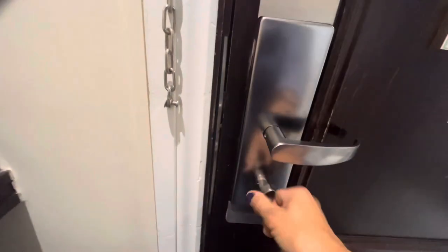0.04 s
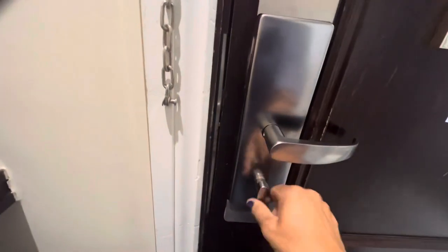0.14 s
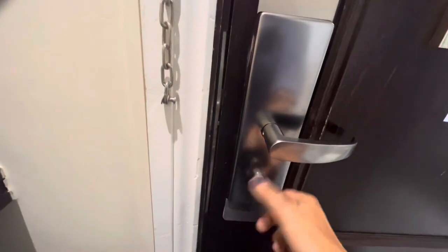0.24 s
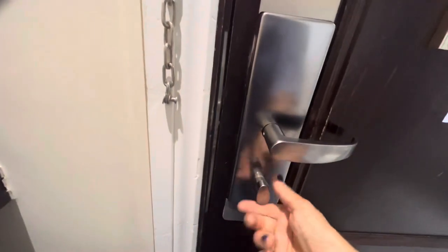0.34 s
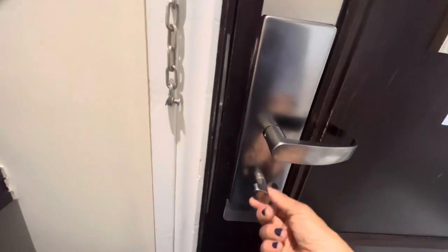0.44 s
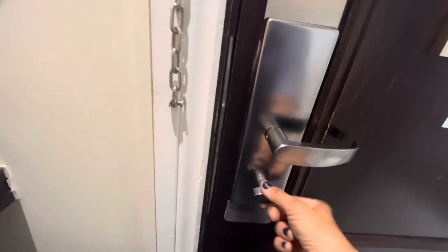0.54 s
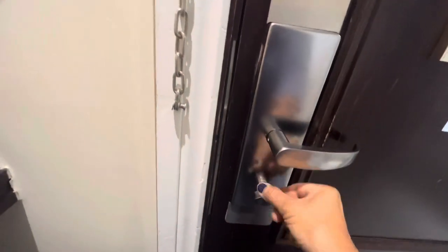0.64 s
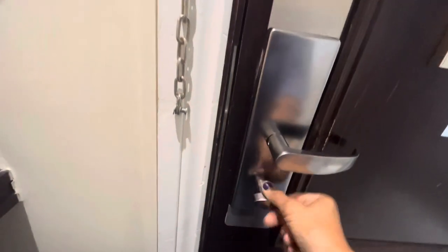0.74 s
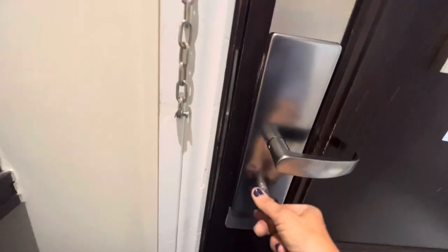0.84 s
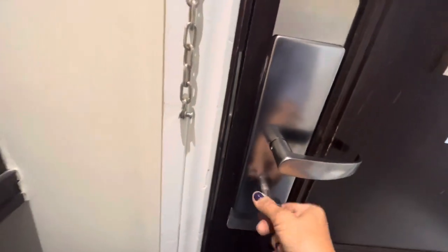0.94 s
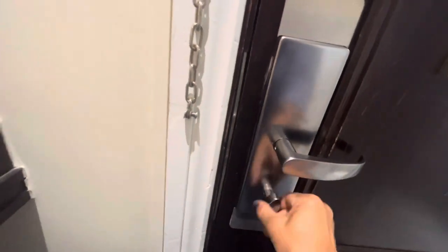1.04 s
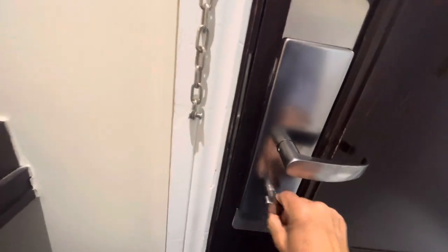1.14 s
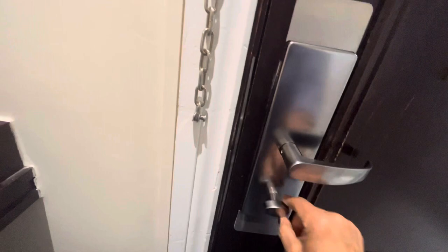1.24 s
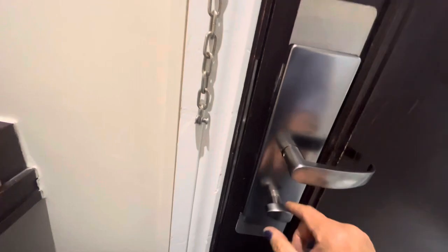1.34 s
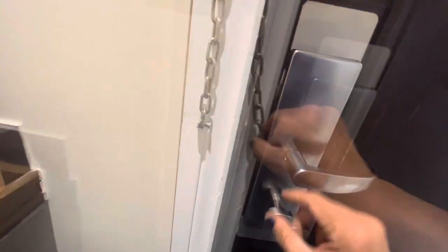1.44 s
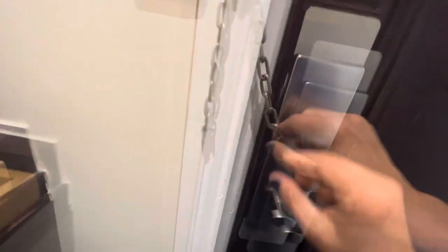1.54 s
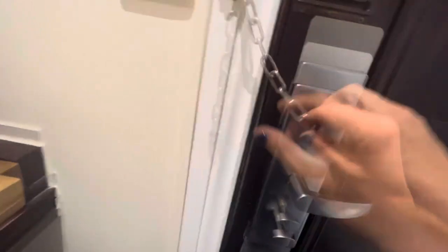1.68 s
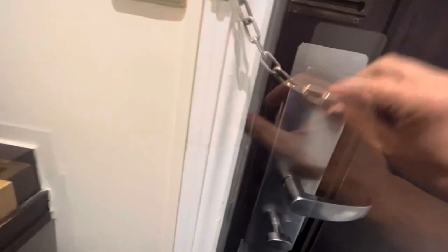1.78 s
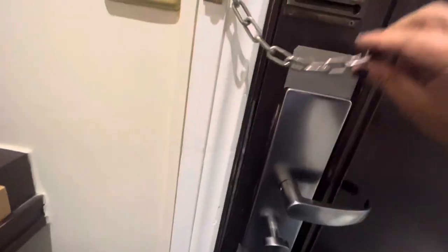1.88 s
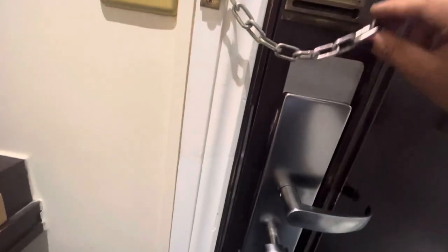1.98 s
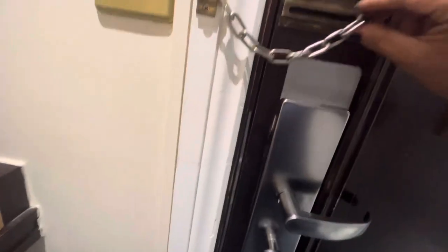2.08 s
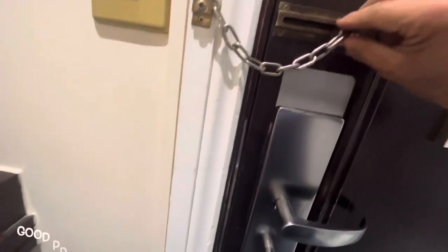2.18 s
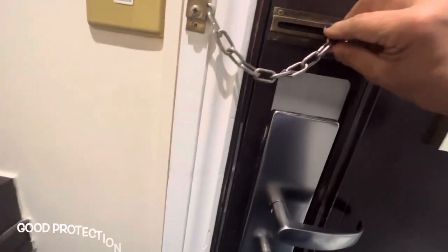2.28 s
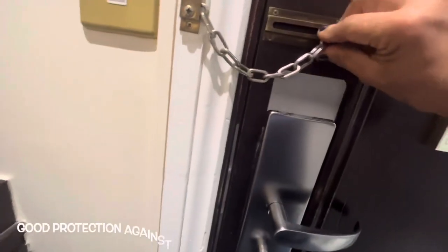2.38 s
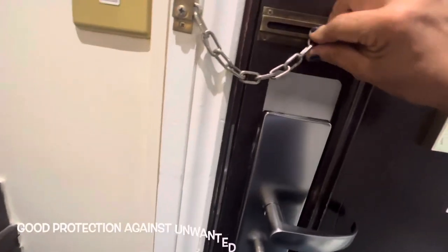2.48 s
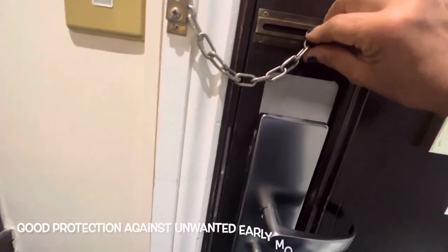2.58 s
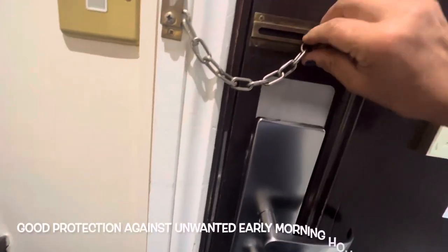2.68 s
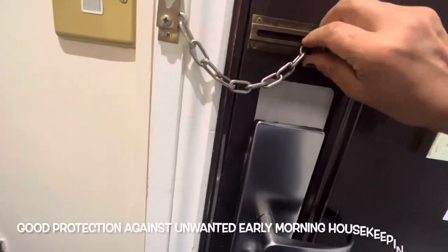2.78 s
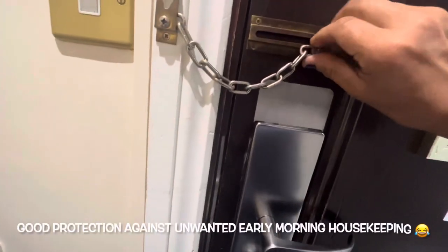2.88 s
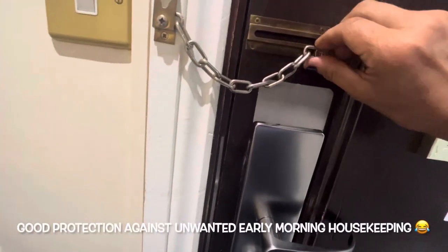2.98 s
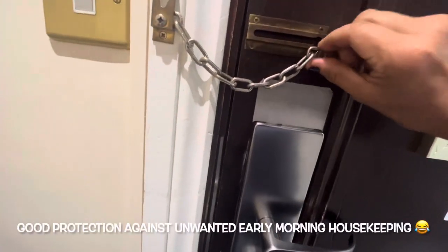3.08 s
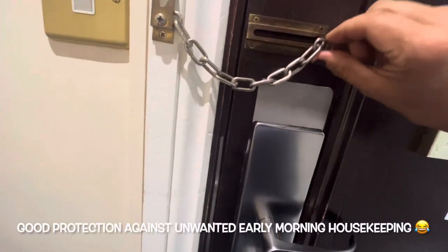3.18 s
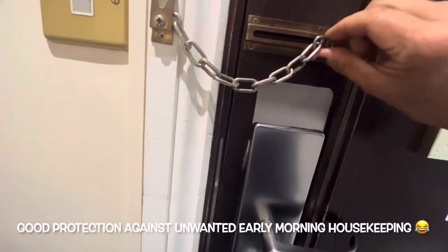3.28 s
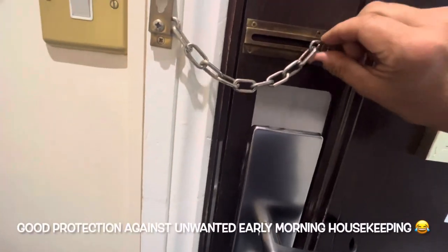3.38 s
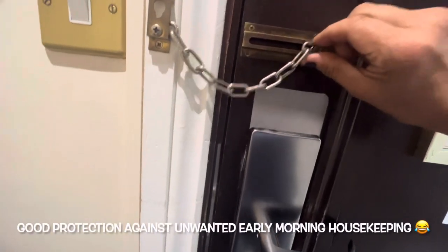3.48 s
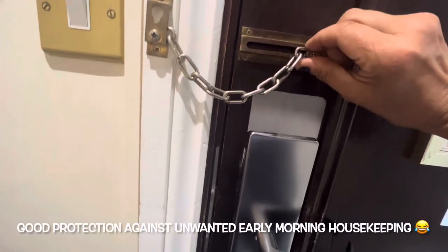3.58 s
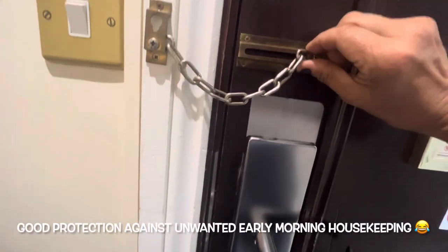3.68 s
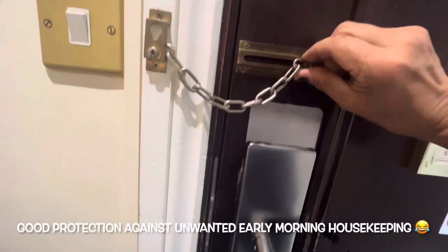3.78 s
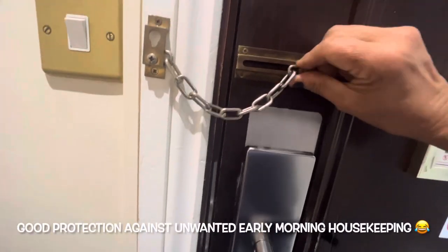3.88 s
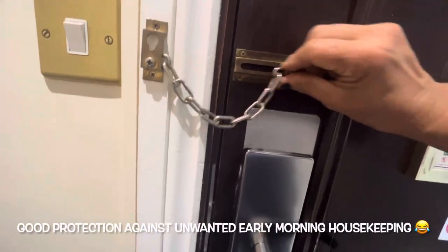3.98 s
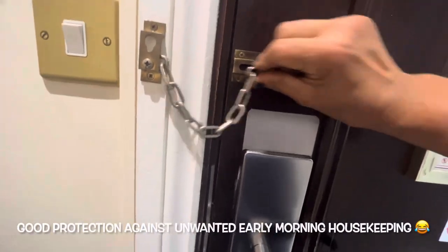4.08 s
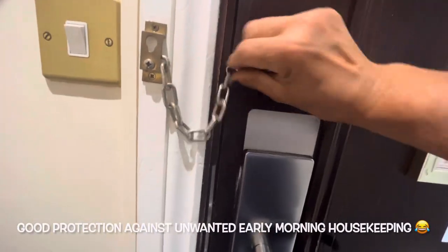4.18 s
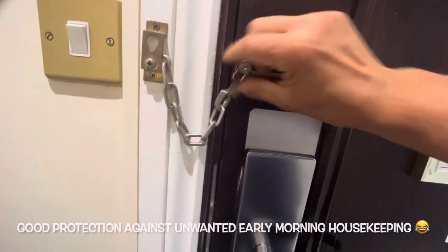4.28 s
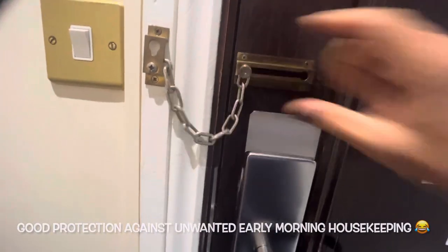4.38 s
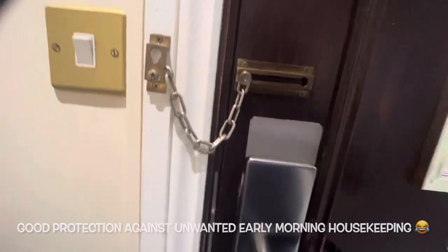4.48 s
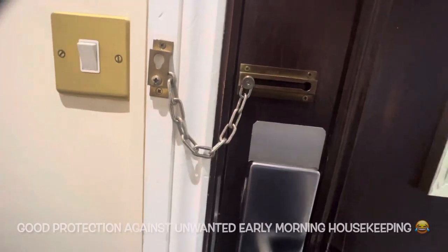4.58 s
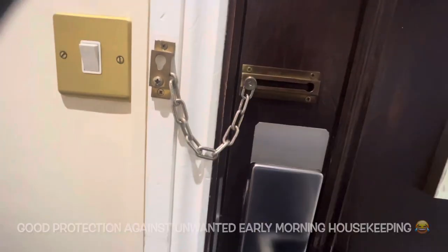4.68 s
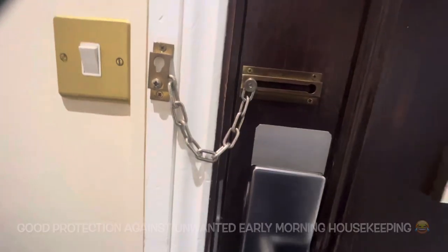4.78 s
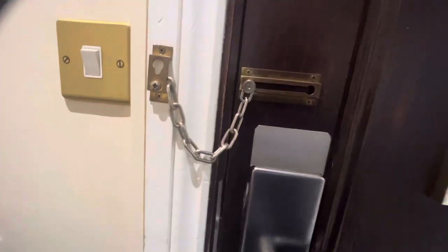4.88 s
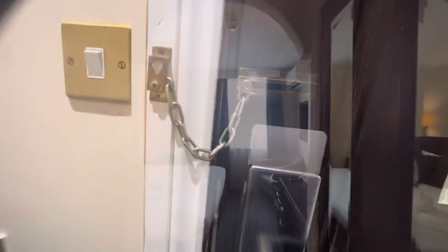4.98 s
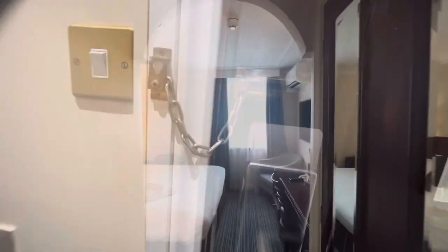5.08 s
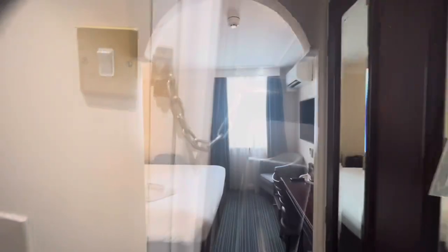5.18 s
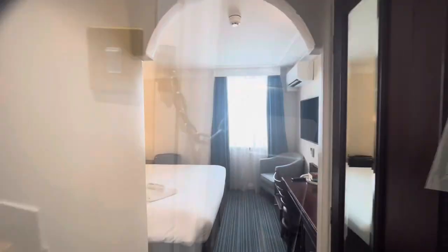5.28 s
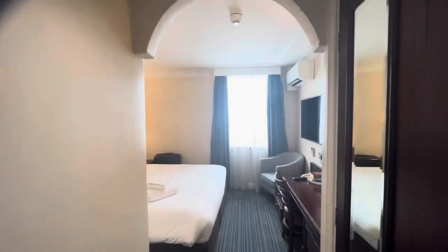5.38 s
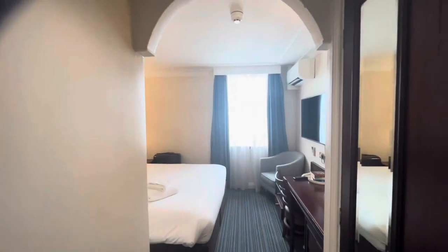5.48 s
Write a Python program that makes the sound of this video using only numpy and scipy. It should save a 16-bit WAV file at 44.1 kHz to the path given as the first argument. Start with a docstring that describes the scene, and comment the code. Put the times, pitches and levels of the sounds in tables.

```python
"""A thumb-turn clicks and grinds in a heavy wooden door until its bolt shoots home with a loud clack.
Then the stud of a security chain knocks about on its brass track and slides along the slot.
Blows are cracks with a resonant, decaying room tail; rubbing is clumps of tiny slips through the same metal.
Decaying modes ring the lock case, track and door leaf; shaped noise gives faint scrape, rustle and ventilation.
"""
import sys
import numpy as np
from scipy import signal
from scipy.fft import rfft, irfft, next_fast_len
from scipy.io import wavfile
from scipy.ndimage import uniform_filter1d

SR = 44100
rng = np.random.default_rng(int(sys.argv[2]) if len(sys.argv) > 2 else 0)


def inscribe(sig):
    """Save sig as 16-bit PCM at rate SR to the path in sys.argv[1].

    A 1-D sig is mono; a 2-D sig holds one channel per row.
    Samples are clipped to [-1, 1] before scaling.
    """
    pcm = np.round(np.clip(np.atleast_2d(sig).T, -1, 1) * 32767)
    wavfile.write(sys.argv[1], SR, pcm.astype(np.int16))


N = 244314
LENGTH = 24576  # samples in one impulse response
HZ = np.fft.rfftfreq(LENGTH, 1 / SR)
T = np.arange(LENGTH) / SR

# pins, springs and bolt: (t/s, level/dB, thud/dB, edge/dB); thud tilts the bass, edge the treble
LOCK_HITS = [(0.065, -20.5, 4, -18), (0.084, -17, 13, -11), (0.178, -25, 11.5, -17), (0.32, -21, 0.5, 14.5),
             (0.329, -4.5, 8.5, -5.5), (0.337, -5.5, 9.5, -6.5), (0.399, -1, 5, 1.5),
             (0.414, -2.5, 2.5, -7.5), (0.438, -0.5, -4.5, -6), (0.449, -5, 5, -17.5),
             (0.513, -0.5, 1, -4.5), (0.559, -11.5, 3.5, -6.5), (0.7, -11.5, 1.5, -4), (0.718, -1, 3, -5),
             (0.833, -13.5, 11, -15), (0.903, -16, 0.5, -17.5), (0.923, -19.5, 16, -16.5),
             (0.935, -8.5, -1, 3.5), (1.002, -3, 4, -2.5), (1.013, -7, 9.5, 12.5), (1.0262, 13.5, -3.5, 8),
             (1.036, 16, -5, -20), (1.053, 8.5, -0.5, 15.5), (1.06, 17, 3, -20.5), (1.272, -20, 11, -12),
             (1.314, -21.5, 7, -29.5)]
# broad colour of the lock, relative: (f/Hz, density/dB per Hz)
LOCK_BODY = [(30, -33), (100, -11.5), (250, -7), (500, -4), (850, -3), (1400, 0), (1900, -4.5), (2600, -8),
             (5000, -16.5), (8000, -19), (13500, -24), (15000, -38), (16000, -44)]
# lock resonances over that colour: (f/Hz, width/Hz, level/dB)
LOCK_PEAKS = [(224.5, 3, 1), (274.6, 12, 1), (348.1, 7.1, -4), (489.7, 12, -3), (518, 12, -1),
              (626, 13.5, 2.5), (687.7, 10, 2), (765, 10, -0.5), (1005, 14, 3.5), (1095, 14, 5.5),
              (1200, 19, -3.5), (1416, 13, 0.5), (1384, 36, 0), (1493.4, 12, 1.5), (1537, 25, 5),
              (1706, 17, -0.5), (1780, 10, -2), (2147, 190, -6), (5140, 180, -12.5), (6920, 300, -16)]
# twists of the thumb-turn: (t at full effort/s, hold/s, level/dB)
TURNS = [(0.07, .03, -46.5), (.44, .14, -46.5), (.74, .03, -50.5), (.93, 0.32, -44)]
# colour of turning against a blow: (f/Hz, gain/dB)
TURN_SHADE = [(150, 0.5), (350, 7.5), (550, 4), (900, 3.5), (1500, -1), (3000, -1), (5300, -1),
              (7000, -14.5), (14000, -15)]
# hollow modes of the lock case in its mortise: (f/Hz, level/dB, t60/s)
CASE_MODES = [(356, -34, .08), (382, -32, 0.056), (439, -36.5, .087), (477, -43.5, 0.081), (515, -39, 0.23),
              (1145, -36, .073)]


def lock(play_db=2.5):
    """The turn grinds, clicks over springs and throws the bolt; play caps how hard the case knocks."""
    case = colour(LOCK_BODY, LOCK_PEAKS)
    shared = diffuse(LENGTH)
    effort = strokes(TURNS, rise_db_per_s=170, fall_db_per_s=400)
    out = rub(case, effort, TURN_SHADE, slips_per_s=340, spread_db=4.5, direct_db=-0.5)
    for s, db, thud_db, edge_db in LOCK_HITS:
        add(out, s, amp(db) * blow(case, shared, thud_db, edge_db, direct_db=1.0))
    s, db, thud_db, edge_db = np.transpose(LOCK_HITS)
    knock_db = np.minimum(db, play_db)
    return out + ring(CASE_MODES, s, knock_db, thud_db, edge_db, swell_s=0.005, vary_db=2.0)


# stud and links: (t/s, level/dB, thud/dB, edge/dB, grip/dB); a tight grip makes the knock dry
CHAIN_HITS = [(1.478, -41, -5, 12.5, 1.5), (1.813, -52.5, 11, 12.5, 7), (2.02, -47, 37, -8, 5),
              (2.176, -2, 6, 11, -9.5), (2.185, -1.5, 0.5, -1, 0), (2.312, -9.5, 4.5, -13, -5.5),
              (2.374, -11.5, 16, -27, 6.5), (2.444, -7.5, 2, -5.5, 1.5), (2.75, -20.5, 4, -37, -8.5),
              (2.781, -22, 14, 15.5, 0.5), (2.934, -27, 0, -7, -3), (2.993, -18.5, -10, -20, -2),
              (3.018, -9, -1.5, -4, 2), (3.3468, 1.5, -2, 5, 0.5), (3.358, -5.5, 10, -13, 4),
              (3.392, -3, 13, -15, 2.5), (3.636, -12.5, 0, -12, -6), (3.647, -15.5, -3, 10, 3),
              (3.678, -4, 10, -31, 4.5), (3.691, -11.5, -4, 15, 5.5), (3.786, -12, 3, 5.5, -2.5),
              (3.822, -12.5, 3.5, -4, 7), (3.863, -3, -1, -3.5, 0.5), (3.957, -9, 3, -13, -4),
              (4.126, -1.5, 13, -28, -8), (4.156, -11, 17.5, 8.5, 5), (4.18, -6, 8.5, 7.5, 2.5),
              (4.259, 1.5, 9, 0.5, -0.5), (4.322, -17, 19, 7.5, -3), (4.353, -10, -14, -21, 5),
              (4.379, -3, 10, -19.5, 8), (4.415, -26, -1, 5, -10), (4.479, -7, 4, -23, 9.5),
              (4.495, -25.5, 23.5, 1.5, -4), (4.525, -28.5, 14, 7.5, 2), (4.656, -23.5, 2.5, -42, 9.5),
              (4.783, -32.5, 18.5, -32, -6), (5.074, -42, 9, -3, 3)]
# broad colour of chain and track, relative: (f/Hz, density/dB per Hz)
CHAIN_BODY = [(30, -72), (150, -21.5), (500, -11), (800, -3), (1300, 2.5), (2000, 3), (2400, 0.5),
              (3500, -0.5), (5500, -6.5), (7300, -13.5), (10000, -15), (13000, -18.5), (16000, -44)]
# chain resonances over that colour: (f/Hz, width/Hz, level/dB)
CHAIN_PEAKS = [(465, 6.6, -13.5), (660, 11, 0), (1040, 66, -1.5), (1190, 47, 0), (1604, 52, 0),
               (2211, 60, 0.5), (2940, 100, -11), (3040, 27, -13.5), (4220, 31, -24), (5040, 15, -28),
               (5200, 20, -6), (5830, 26, -4), (6520, 18, 1), (9170, 310, -13)]
# pushes of the stud along its track: (t at full effort/s, hold/s, level/dB)
SLIDES = [(2.35, .15, -74), (2.86, 0.051, -63), (3.04, 0.011, -61.5), (3.65, .02, -67), (4.07, 0.065, -31),
          (4.45, .08, -67)]
# colour of sliding against a blow: (f/Hz, gain/dB)
SLIDE_SHADE = [(150, 1), (380, 3.5), (700, -0.5), (1100, 0), (1900, 1), (3500, -2), (5500, -2),
               (8000, -1.5), (12500, -6.5), (15000, -6)]
# modes of the track plate and links: (f/Hz, level/dB, t60/s)
TRACK_MODES = [(824, -47, 0.26), (1047, -43, .22), (1141, -42.5, 0.27), (1260, -48, 0.22),
               (1558, -39, 0.19), (2850, -55, 0.42), (3790, -50, 0.08), (4580, -47.5, 0.25),
               (5040, -42.5, 0.17), (5400, -45.5, 0.16), (5540, -48, 0.12), (6340, -59, 0.067),
               (6200, -45, 0.12), (6750, -75, 0.18)]


def chain(damping_per_db=0.88):
    """The stud knocks and slides on the brass track; a tighter grip makes the metal ring less."""
    track = colour(CHAIN_BODY, CHAIN_PEAKS)
    shared = diffuse(LENGTH)
    effort = strokes(SLIDES, rise_db_per_s=108, fall_db_per_s=233)
    out = rub(track, effort, SLIDE_SHADE, slips_per_s=520, spread_db=3.5, direct_db=-6.5)
    for s, db, thud_db, edge_db, grip_db in CHAIN_HITS:
        add(out, s, amp(db) * blow(track, shared, thud_db, edge_db, direct_db=grip_db))
    s, db, thud_db, edge_db, grip_db = np.transpose(CHAIN_HITS)
    damped_db = db - damping_per_db * grip_db
    return out + ring(TRACK_MODES, s, damped_db, thud_db, edge_db, swell_s=0.0022, vary_db=2.0)


# slow modes of the door leaf: (f/Hz, level/dB, t60/s)
DOOR = [(44.2, -8, 0.94), (59, 5, 0.69), (85, -7, 0.94), (95, -3, 0.42), (130, -4.5, 0.23), (155, -8.5, 1),
        (202, -10.5, 0.37), (237, -8.5, 0.53)]
# the hand shoves the leaf while it works the chain: (t/s, level/dB)
SHOVES = [(2.189, -46.5), (2.44, -51.5), (3.352, -48.5), (3.645, -47.5), (4.17, -46)]


def door(coupling_db=-55, thud_share=0.51):
    """The heavy leaf booms softly under every lock blow and every shove of the hand."""
    blows = [(s, db + thud_share * thud_db + coupling_db) for s, db, thud_db, _ in LOCK_HITS]
    return ring(DOOR, *np.transpose(blows + list(SHOVES)))


# faint scrape of a link, relative: (f/Hz, density/dB per Hz)
SETTLE = [(1200, -29.5), (1900, 2), (2600, -14), (3800, -9), (4200, 0.5), (4700, -13), (6000, -23),
          (9800, -11), (12000, -32)]
# the chain settles: (t at full effort/s, hold/s, level/dB)
SETTLING = [(4.75, .08, -75.5)]
# soft rustle of movement, relative: (f/Hz, density/dB per Hz)
RUSTLE = [(100, -30.5), (400, -8), (1100, 3), (2500, 5), (4500, -3), (7000, -7), (10000, -4), (13500, -17),
          (15500, -34.5)]
# a last movement: (t at full effort/s, hold/s, level/dB)
RUSTLING = [(5.48, 0.019, -68.5)]


def stirring():
    """Coloured noise swells as the released chain scrapes faintly and someone moves."""
    link = air(SETTLE) * strokes(SETTLING, rise_db_per_s=90, fall_db_per_s=172)
    rustle = air(RUSTLE) * strokes(RUSTLING, rise_db_per_s=101, fall_db_per_s=220)
    return link + rustle


# ventilation colour, relative: (f/Hz, density/dB per Hz)
VENT = [(15, -32.5), (28, -22), (42, 8.5), (60, 5.5), (90, 2), (125, -14), (165, -8.5), (220, -11.5),
        (290, -13), (420, -23.5), (1050, -32), (1560, -16), (2400, -35.5), (5000, -39.5), (10000, -48),
        (16000, -67)]
# brief dips in its level: (t/s, half width/s, depth/dB)
DIPS = [(1.55, 0.34, -6.5), (5.35, 0.19, -14)]


def ventilation(level_db=-58.5):
    """Steady duct rumble with a faint band of hiss, as coloured noise; the level dips twice."""
    t = np.arange(N) / SR
    dip_db = sum(db * np.exp(-((t - s) / width) ** 2) for s, width, db in DIPS)
    return air(VENT) * amp(level_db + dip_db)


def blow(part, shared, thud_db, edge_db, direct_db, alike=0.22):
    """One blow: its hardness tilts the colour, and its place changes part of the ring."""
    room = tail(np.sqrt(alike) * shared + np.sqrt(1 - alike) * diffuse(LENGTH))
    return response(part * tilt(HZ, thud_db, edge_db) * ripple(), room, direct_db)


def rub(part, effort, shade, slips_per_s, spread_db, direct_db, catch_db=5.0, place_s=.045, count=5):
    """Friction: clumps of little slips excite the part, whose ring changes as the contact moves on."""
    catches = uniform_filter1d(rng.standard_normal(N), size=500)
    spread = np.minimum(rng.exponential(1, N), 3)
    size = amp(spread_db * spread + catch_db * catches / catches.std())
    happens = rng.random(N) < slips_per_s / SR
    slips = unit(size * rng.choice([-1, 1], N) * happens) * np.sqrt(N) * effort
    place = np.arange(N) / SR // place_s % count  # cycles through a few contact points
    out = np.zeros((2, N))
    for k in range(count):
        gain = part * amp(read(shade, HZ)) * ripple()
        sound = response(gain, tail(diffuse(LENGTH)), direct_db)
        out += signal.oaconvolve((slips * (place == k))[None], sound, axes=1)[:, :N]
    return out


def strokes(rows, rise_db_per_s, fall_db_per_s):
    """Gain of a run of hand movements: each swells, holds and dies away."""
    t = np.arange(N) / SR
    gain = np.zeros(N)
    for s, hold, db in rows:
        rise_db = rise_db_per_s * np.maximum(s - t, 0)
        fall_db = fall_db_per_s * np.maximum(t - s - hold, 0)
        gain += amp(db - rise_db - fall_db)
    return gain


def colour(body, peaks):
    """Gain of a metal part: resonances standing on a broad body, with unit mean power."""
    power = amp(read(body, HZ)) ** 2
    for hz, width, db in peaks:
        power = power + amp(db) ** 2 / (1 + ((HZ - hz) / width) ** 2) ** 2
    return np.sqrt(power / power.mean())


def ripple(depth_db=2.5, size=190):
    """Each point of contact favours some of the upper resonances and misses others."""
    bumps = uniform_filter1d(uniform_filter1d(rng.standard_normal(len(HZ)), size), size)
    return amp(depth_db * bumps / bumps.std() * HZ / (HZ + 1500))  # depth grows towards the treble


# how much of a blow's thud each frequency gets: (f/Hz, share)
THUD_SHARE = [(100, 0.66), (300, 1), (600, 0.98), (1100, 0)]
# how much of its edge each frequency gets: (f/Hz, share)
EDGE_SHARE = [(2100, 0.044), (3200, 0.44), (5500, .6), (7800, 0.94)]


def tilt(hz, thud_db, edge_db):
    """A heavy blow gains bass and a hard one gains treble."""
    return amp(thud_db * read(THUD_SHARE, hz) + edge_db * read(EDGE_SHARE, hz))


def crack(contact_s=0.0041, snap_db=-2, snap_hz=6500):
    """Direct sound of metal on metal: a sharp treble snap and a few milliseconds of chatter."""
    chatter = rfft(unit(diffuse(2048) * np.exp(-T[:2048] / contact_s)), LENGTH)
    snap = amp(snap_db) * (1j * HZ / (snap_hz + 1j * HZ)) ** 2
    return (chatter + snap) / np.sqrt(1 + abs(snap) ** 2)


# straight path against the room: (f/Hz, level/dB)
DIRECT = [(200, -10.5), (1500, -10.5), (4000, -12.5), (8000, -2), (13000, 10.5)]


def response(gain, room, direct_db):
    """What the microphones hear of one blow on a part: straight path plus room."""
    direct = amp(read(DIRECT, HZ) + direct_db)
    paths = causal(direct) * crack() + rfft(room)
    return irfft(paths * causal(gain / np.sqrt(1 + direct ** 2))) * end_fade()


# ring of door and room together: (f/Hz, t60/s)
DECAY = [(100, 0.84), (250, 0.86), (500, 0.33), (1000, 0.35), (2000, 0.29), (4000, 0.33), (6000, 0.29),
         (9000, .27), (12500, 0.34), (15000, 0.32)]


def tail(noise, build_at_900_hz_s=0.00072, early_db=1, early_s=0.045):
    """Door and room: dense early reflections, then a decay that is longest in the bass."""
    hz, t, z = signal.stft(noise, SR, nperseg=256)
    t60 = read(DECAY, hz)[:, None]
    rise_s = build_at_900_hz_s * np.sqrt(1000 / (hz[:, None] + 100))
    shape = amp(-60 * t / t60) * (1 - np.exp(-t / rise_s))
    shape = shape * (1 + amp(early_db) * np.exp(-t / early_s))
    shape /= np.linalg.norm(shape, axis=1, keepdims=True)
    return unit(signal.istft(z * shape, SR, nperseg=256)[1][:, :LENGTH])


# likeness of the two channels: (f/Hz, correlation)
ALIKE = [(40, .97), (70, 0.93), (150, 0.43), (300, 0.55), (600, .1), (3000, 0.04), (8000, .33),
         (13000, .38)]


def ring(modes, s, db, thud_db=0, edge_db=0, swell_s=0.006, vary_db=1.5):
    """Blows at times s ring shared modes at varied strength; side phases differ where less alike."""
    hz, mode_db, t60 = np.transpose(modes)[:, :, None]
    shape = amp(mode_db - 60 * T / t60) * (1 - np.exp(-T / swell_s)) * end_fade()
    bank = shape * np.exp(2j * np.pi * hz * T)
    side_phase = np.arccos(read(ALIKE, hz.T))
    sides = np.exp(1j * np.array([[0], [1]]) * side_phase)
    luck, start = rng.random((len(s), len(modes), 2)).T
    strength = amp(db + vary_db * (2 * luck - 1)) * tilt(hz, thud_db, edge_db)
    pushes = strength * np.exp(2j * np.pi * start)
    out = np.zeros((2, N))
    for time, push in zip(s, pushes.T):
        add(out, time, ((sides * push) @ bank).real)
    return out


def diffuse(size):
    """Stereo noise as two microphones hear it: alike in the deep bass, far less so above."""
    a, b = rfft(rng.standard_normal((2, size)))
    c = read(ALIKE, np.fft.rfftfreq(size, 1 / SR))
    return irfft(np.array([a, c * a + np.sqrt(1 - c ** 2) * b]), size)


def air(spectrum):
    """Soft steady noise of a given colour, at unit power."""
    gain = amp(read(spectrum, np.fft.rfftfreq(N, 1 / SR)))
    return unit(irfft(rfft(diffuse(N)) * gain, N)) * np.sqrt(N)


def causal(gain):
    """Minimum-phase response for a gain: it rings only after the blow."""
    log_gain = np.log(np.maximum(gain, 1e-5))
    circle = np.concatenate([log_gain, log_gain[-2:0:-1]])
    return np.exp(np.conj(signal.hilbert(circle)))[:len(gain)]


def end_fade():
    """Fades the last tenth of an impulse response to zero."""
    return np.minimum(10 * (1 - T / T[-1]), 1)


def amp(db):
    """Decibels to gain."""
    return 10 ** (np.asarray(db) / 20)


def unit(x):
    """Scales to a mean energy of one per channel."""
    return x / np.sqrt(np.mean(np.sum(x ** 2, axis=-1)) + 1e-20)


def read(points, hz):
    """A spectrum, joined by straight lines over log frequency."""
    f, value = np.transpose(points)
    return np.interp(np.log(hz + 1), np.log(f + 1), value)


def add(mix, s, sound):
    """Mixes a stereo sound in at time s."""
    part = mix[:, max(round(s * SR), 0):][:, :sound.shape[1]]
    part += sound[:, :part.shape[1]]


def scene():
    """Lock, chain and door leaf in a quietly ventilated room."""
    return lock() + chain() + door() + stirring() + ventilation()


# left minus right: (f/Hz, level/dB)
LEAN = [(60, 3.5), (170, -1), (350, -2), (700, 1), (1400, 5.5), (2800, 1.5), (5500, 8.5), (10000, -3),
        (14000, -0.5)]


def record(dry, low_cut_hz=36, band_limit_hz=16300):
    """Colours each microphone, cuts the deepest bass, rounds the loudest peaks, then limits the band."""
    size = next_fast_len(N + LENGTH)
    hz = np.fft.rfftfreq(size, 1 / SR)
    lean_db = read(LEAN, hz)
    sides = amp(np.array([lean_db, -lean_db]) / 2)
    low_cut = 1 / np.sqrt(1 + (low_cut_hz / (hz + 1)) ** 12)
    heard = irfft(rfft(dry, size) * low_cut * sides, size)[:, :N]
    rounded = heard / (1 + (heart_level(heard)) ** 6) ** (1 / 6)
    low_pass = signal.firwin(511, band_limit_hz, window=("kaiser", 9), fs=SR)
    return signal.oaconvolve(rounded, low_pass[None], "same", axes=1)


def heart_level(heard, ceiling=0.88):
    """Level relative to the ceiling at which peaks are rounded."""
    return heard / ceiling


dry = scene()
out = record(dry)
inscribe(out)
```